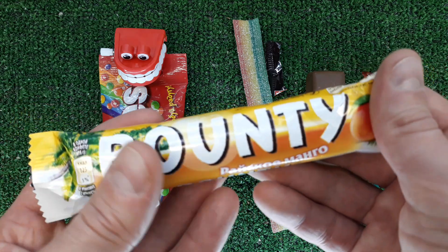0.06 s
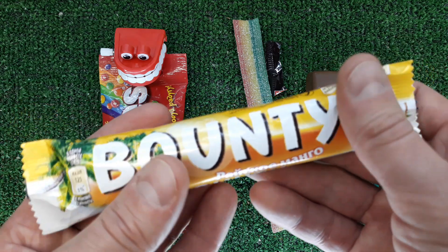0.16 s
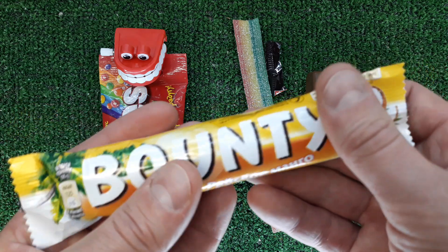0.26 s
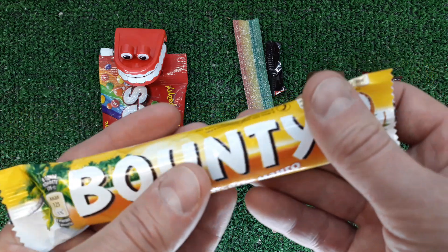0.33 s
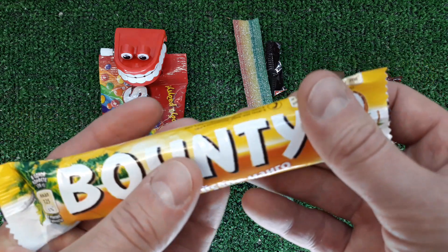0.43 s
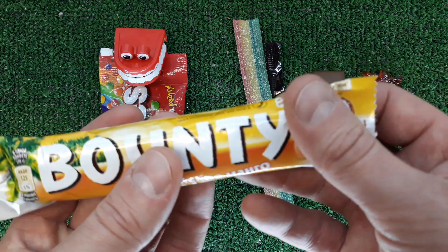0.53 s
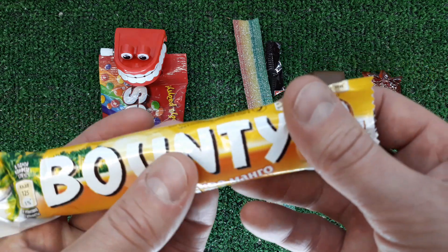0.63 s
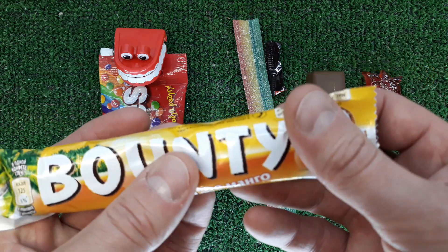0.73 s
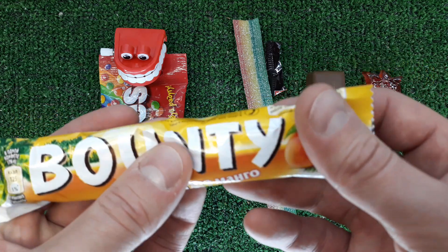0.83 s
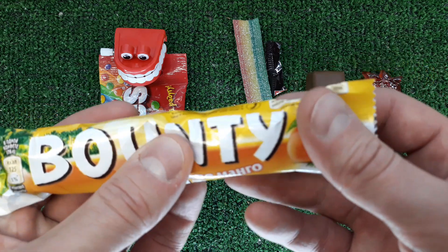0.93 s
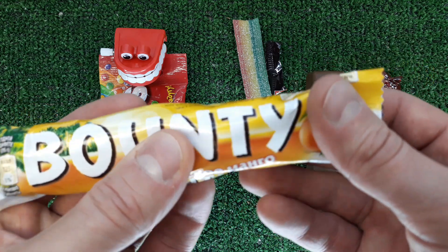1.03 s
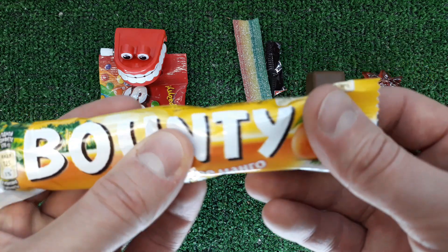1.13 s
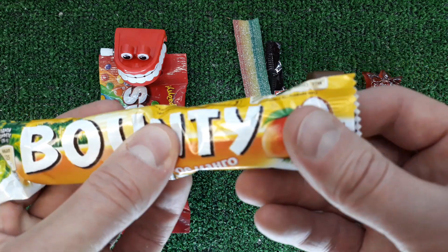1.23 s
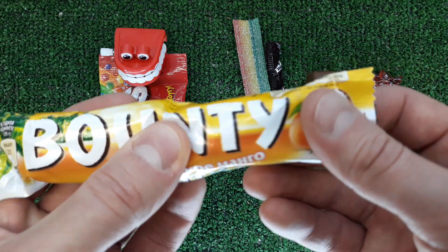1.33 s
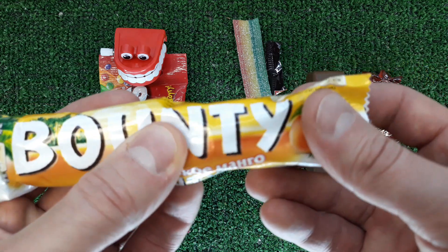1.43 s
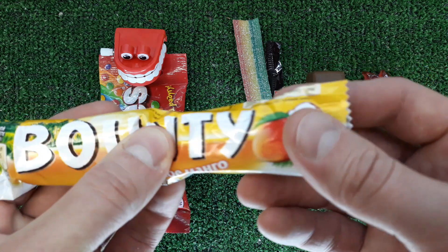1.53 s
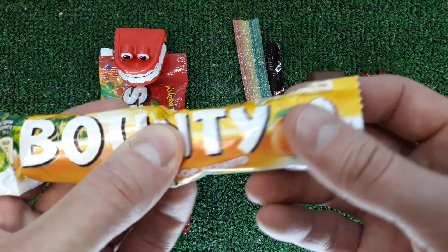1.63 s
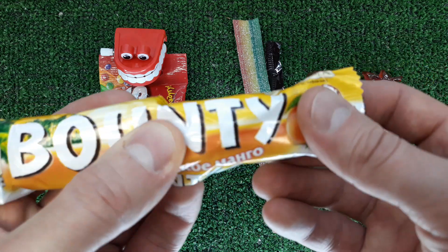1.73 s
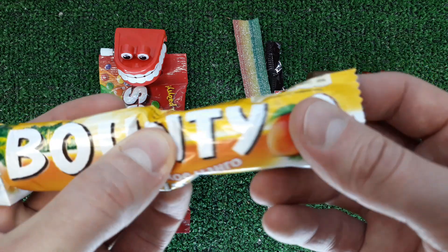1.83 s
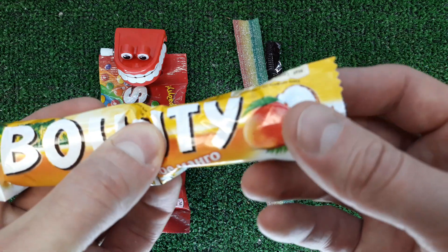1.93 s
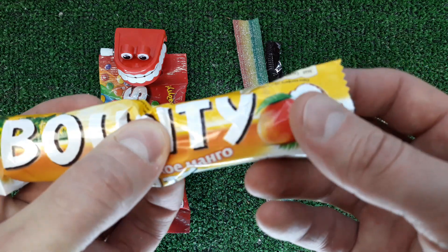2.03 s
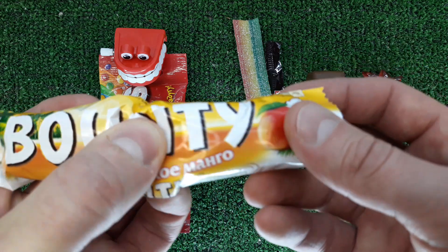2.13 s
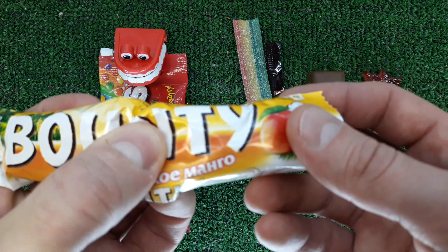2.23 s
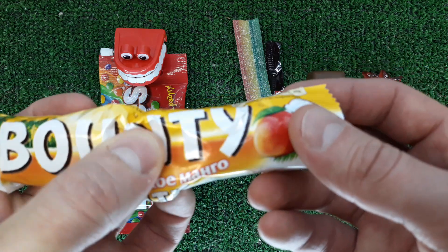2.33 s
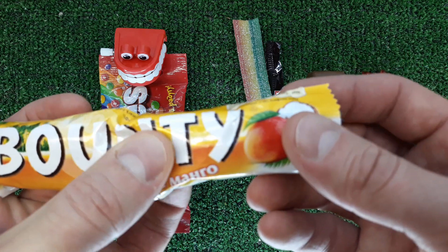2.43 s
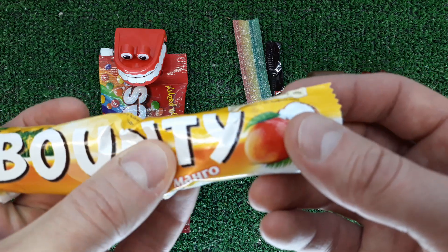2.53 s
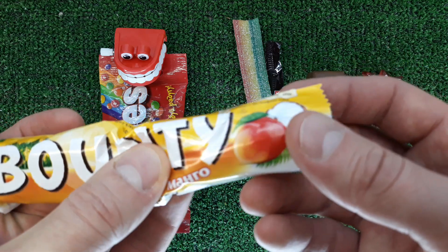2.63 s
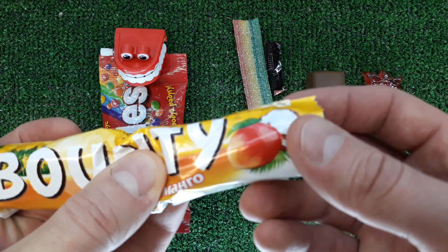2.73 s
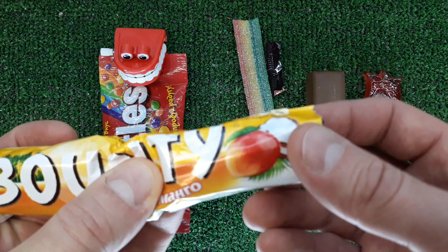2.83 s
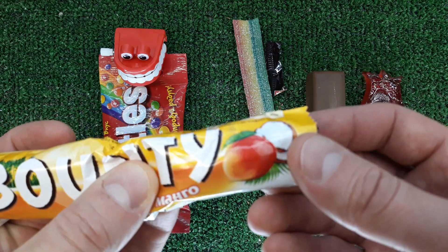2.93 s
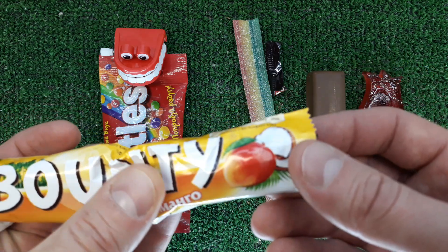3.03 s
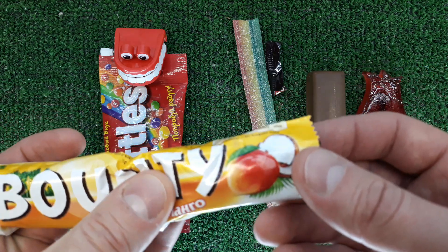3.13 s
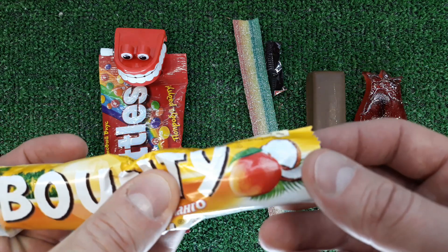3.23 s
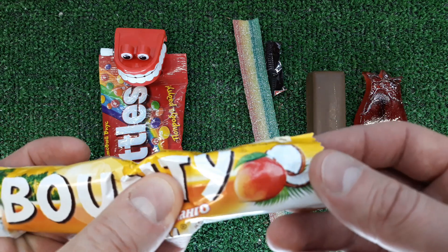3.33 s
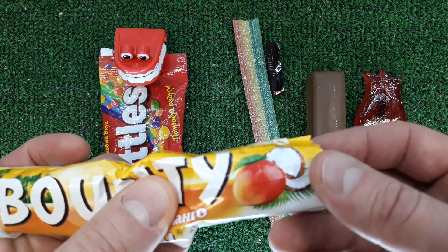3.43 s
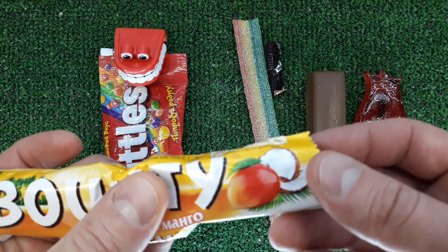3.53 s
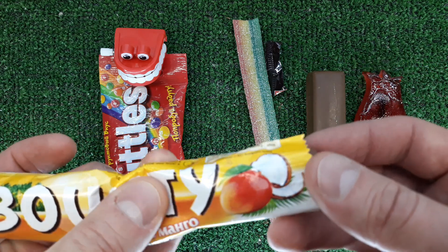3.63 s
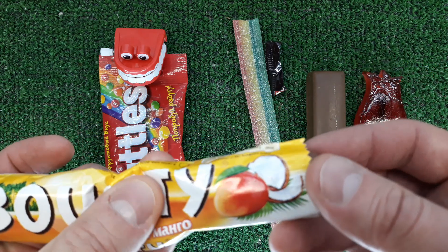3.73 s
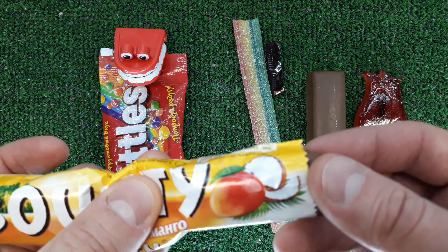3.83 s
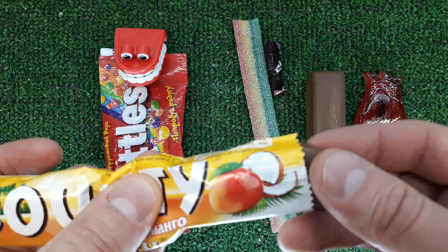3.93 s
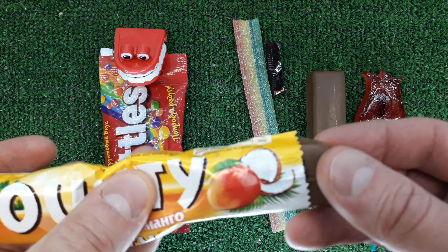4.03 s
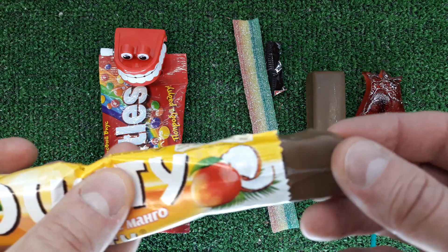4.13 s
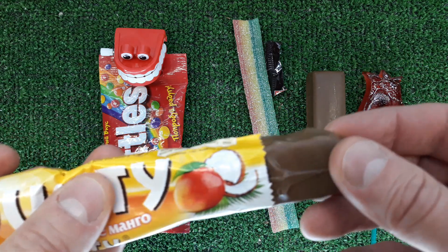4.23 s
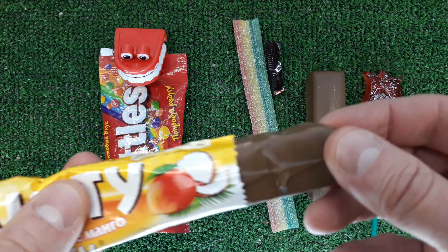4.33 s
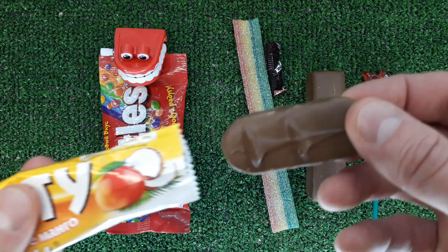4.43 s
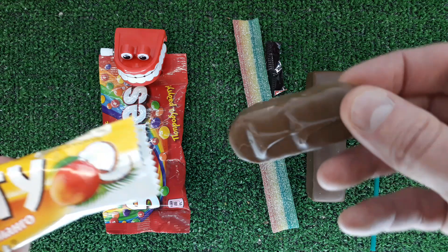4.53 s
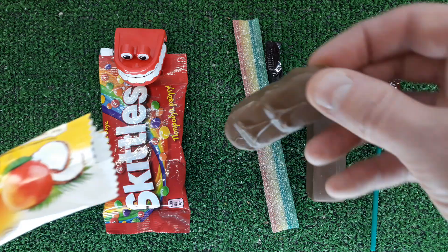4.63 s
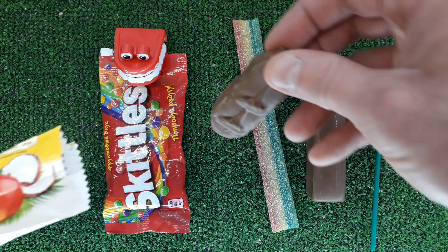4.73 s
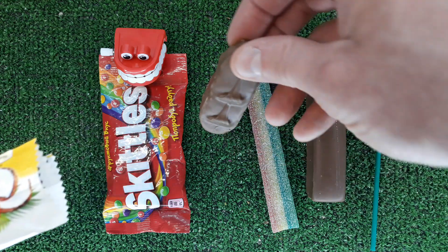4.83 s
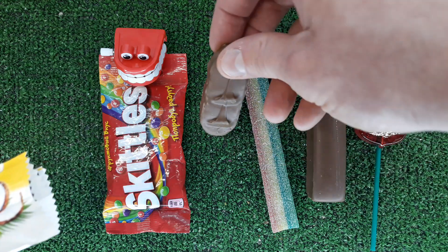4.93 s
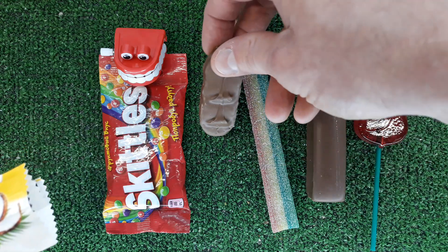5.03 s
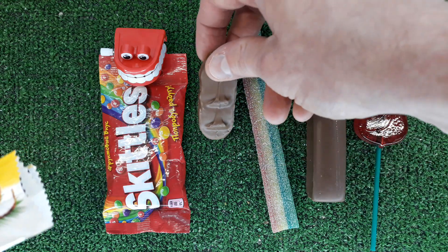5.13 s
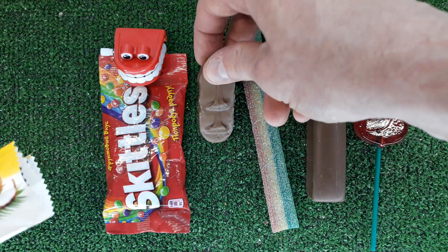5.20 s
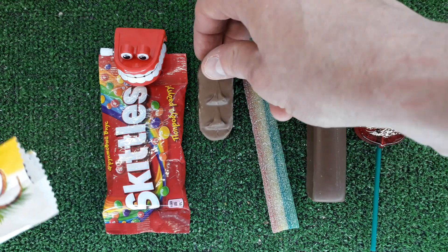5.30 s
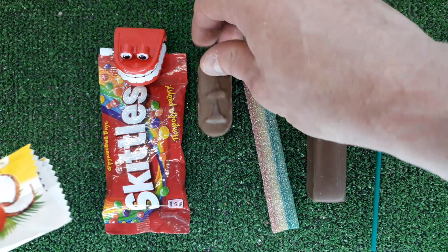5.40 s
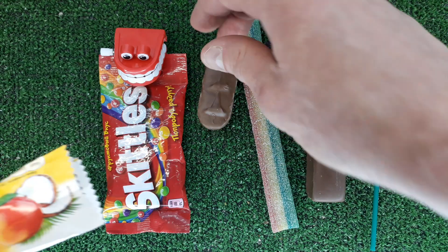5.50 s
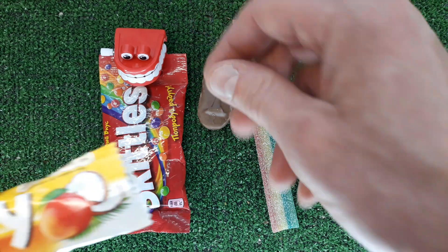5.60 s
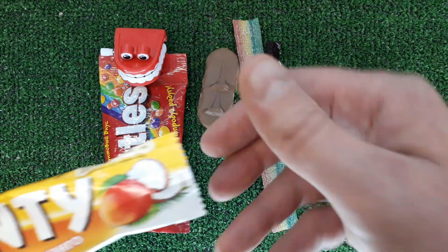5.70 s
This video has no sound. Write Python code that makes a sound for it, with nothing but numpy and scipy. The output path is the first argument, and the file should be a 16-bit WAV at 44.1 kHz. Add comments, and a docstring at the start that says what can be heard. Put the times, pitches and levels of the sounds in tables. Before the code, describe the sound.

Very close crinkling of stiff film: dry sharp snaps with fine rustle between them, busiest in the first couple of seconds, then irregular with short gaps. Around four seconds the sleeve sounds hollow as a bar is pulled free with a clunk and rough rubbing. Then a quiet pause, tiny crackles, and a muffled thud as a hand touches the padded table. Small indoor room with light reflections and low background tone.

```python
"""Sharp crackles and a fine rustle: two hands squeeze a plastic sweet wrapper close to a small microphone,
slide a chocolate bar out and lay it down. Buckling creases release volleys of micro-cracks that ring the film,
stick-slip of skin on film makes the rustle, and damped swings make the dull knocks of the bar and air pockets.
A hand bumps the padded table and rings its modes; a small quiet room adds echoes, a short tail and a faint tone."""
import sys
import numpy as np
from scipy import signal
from scipy.io import wavfile
from scipy.ndimage import uniform_filter1d

SR = 44100
rng = np.random.default_rng(int(sys.argv[2]) if len(sys.argv) > 2 else 0)


def master(y):
    """Save y as 16-bit WAV."""
    cut = np.clip(np.atleast_2d(y).T, -1, 1)
    pcm = np.round(cut * 32767)  # scale
    wavfile.write(sys.argv[1], SR, pcm.astype(np.int16))


def volts(x):
    """Linear amplitude factor 10**(x/20) for a level x in dB, scalar or array-like."""
    e = np.asarray(x, float) / 20
    return 10 ** e


N = 254016


def read(points, hz):
    """Linear interpolation in dB or seconds along a logarithmic frequency axis."""
    f, value = np.transpose(points)
    return np.interp(np.log(hz + 1), np.log(f + 1), value)


def evened(x):
    """Root-mean-square normalisation: scales to rms 1."""
    return x / np.sqrt(np.mean(x ** 2) + 1e-20)


def causal(points, size=1024):
    """Minimum phase: the Hilbert transform of the log gain gives the most compact causal impulse response."""
    hz = abs(np.fft.fftfreq(4 * size, 1 / SR))
    log_gain = np.log(volts(np.maximum(read(points, hz), -100)))
    return np.fft.ifft(np.exp(np.conj(signal.hilbert(log_gain)))).real[:size]


# clear snaps of buckling creases; levels before sleeve and room, the middle band's energy spread over 1 ms:
# start_s, middle_band_level_db, ring_hz, low_pop_db (re middle band), air_db (re middle band)
CREASE_SNAPS = [(.0008, -27, 2290, -1.5, -22), (.0055, -23.5, 3350, 4, -31),
                (0.0367, -24.5, 6250, -28, -29.5), (.049, -25.5, 1900, -1.5, -11),
                (0.062, -30, 3700, -8, -36), (0.1704, -28.5, 3430, -8, -31), (.2239, -41, 3750, -19, -16),
                (0.25, -37, 5800, -8, -29), (0.304, -35, 3900, -26, -7), (.314, -22, 4000, -9, -9.5),
                (.3331, -38, 5140, -6, -16), (.3368, -38.5, 2040, 3.5, -20), (.3631, -21, 3920, -3.5, -20),
                (0.4998, -32, 6450, -15, -6), (0.5131, -25, 7450, -3.5, -4), (.5181, -26, 4100, -11, -20),
                (.539, -36.5, 910, 8.5, -6), (0.6577, -41, 3900, -9, -18), (.7507, -22, 5550, -11, -12),
                (0.8075, -23.5, 4900, -10, -39), (0.8146, -27.5, 2500, 0, -33),
                (0.8285, -14, 5400, -7.5, -11.5), (0.8553, -24, 6150, -14, -26),
                (0.8663, -18.5, 1670, -23, -12), (0.869, -12.5, 4200, -7, -16.5),
                (.963, -17, 5800, -3.5, -22), (.98, -24, 1550, -.5, -29), (0.9909, -18.5, 2000, -3, -14),
                (1.0042, -18.5, 3800, -8.5, -11), (1.0112, -15, 6050, -11, -9),
                (1.0336, -30, 3730, -20, -44), (1.0428, -20, 7060, -6, -9), (1.078, -13, 4400, -6.5, -30),
                (1.0873, -27, 4630, -22, -33), (1.1021, -29, 5120, -26, -39), (1.158, -28, 7110, -4, -12),
                (1.1651, -28.5, 1800, -2, -29), (1.1697, -15, 6800, -2, -7), (1.1809, -21.5, 1940, -2, -39),
                (1.1988, -29, 3920, -20, -29.5), (1.2067, -8.5, 8350, -7.5, -6),
                (1.2216, -10.5, 4200, -5, -13), (1.23, -12.5, 5550, -21, -18),
                (1.2517, -36, 1520, 9, -25.5), (1.2588, -18.5, 3870, -8.5, -28.5),
                (1.264, -14.5, 5800, -17, -15), (1.327, -36, 1080, 2, -21), (1.3335, -19, 6540, -1.5, -26),
                (1.3367, -9.5, 6640, -10, -5), (1.3451, -27.5, 1290, 1.5, -29.5),
                (1.3598, -14.5, 1916, -.5, -30), (1.3758, -21.5, 4670, -23, -33),
                (1.3909, -12, 5300, -6.5, -20), (1.4002, -18.5, 3800, -6.5, -21),
                (1.4188, -36, 3100, 12.5, -33.5), (1.4344, -12.5, 5900, -39, -12),
                (1.4398, -23, 4000, -9, -41), (1.4948, -20, 4900, -11, -6.5), (1.5047, -9, 7600, -5.5, -23),
                (1.522, -9.5, 1790, -7, -13), (1.5285, -19, 4700, -25, -2.5), (1.5321, -19.5, 5300, 2, -17),
                (1.5373, -10, 1700, -3.5, -7), (1.5656, -17.5, 3470, -30, -16),
                (1.597, -31.5, 4180, -6, -44), (1.662, -39, 3680, 10, -27), (1.6667, -19, 5000, -6.5, -29),
                (1.6724, -10, 6130, -5, -6.5), (1.6834, -23, 3370, -38, -58),
                (1.6865, -24.5, 4760, -24, -33), (1.6964, -8, 7500, -9, -2),
                (1.7157, -24, 5470, -14, -26.5), (1.7417, -19, 4930, -11, -10),
                (1.747, -26.5, 1310, 3.5, -31.5), (1.7553, -22, 2970, -2, -27),
                (1.7576, -7.5, 5800, -8.5, -17.5), (1.8292, -36, 1400, 10, -8),
                (1.845, -29.5, 1640, 2, -38), (1.849, -11, 5950, -6.5, -13), (1.8553, -7, 5170, -31, -17),
                (1.8585, -11.5, 4700, -42, -42.5), (1.8652, -20.5, 1400, 2, -22.5),
                (1.931, -17.5, 6030, -12.5, -5), (1.9575, -25, 2820, -5, -34),
                (2.0459, -18, 4980, -19, -37.5), (2.053, -26, 3490, -8, -18),
                (2.0602, -18, 4700, -15.5, -18), (2.0909, -22, 2130, -8, -23),
                (2.1001, -12.5, 1540, -7, -9.5), (2.1082, -22.5, 6850, -13, -31),
                (2.125, -27, 7360, -29, 2), (2.1478, -8, 4770, -8.5, -13), (2.2869, -49, 1200, 8, -10),
                (2.337, -46.5, 5700, -4, -15), (2.3552, -31.5, 6680, -16.5, -13),
                (2.3582, -20, 3930, -6, -43), (2.3624, -11, 7000, -14, -10), (2.3909, -11.5, 4550, -7, -19),
                (2.4254, -34, 3300, -24, -41), (2.4391, -39, 1220, 10.5, -28),
                (2.4842, -25.5, 3920, -6.5, -47), (2.5169, -30, 3200, -2.5, -33),
                (2.5387, -32, 2760, -9, -19), (2.5587, -36, 6070, -6, -30.5),
                (2.5683, -23.5, 3280, -11, -38), (2.5946, -21.5, 6500, -10.5, -4.5),
                (2.623, -42, 2030, 9, -32), (2.6843, -19.5, 6290, -16, -27), (2.943, -38.5, 5380, -26, -31),
                (2.97, -38.5, 6940, -29, -27), (2.9786, -13.5, 5440, -8, -17), (3.0585, -15, 5900, -13, -3),
                (3.0832, -31.5, 3030, -6, -36), (3.0969, -33, 1440, 0, -25), (3.1646, -30.5, 3430, -4, -44),
                (3.3102, -45, 7100, -21, 4), (3.33, -55, 1640, 12, -16), (3.356, -34.5, 2040, -3.5, -30),
                (3.414, -14.5, 5130, -26, -11), (3.442, -29.5, 4500, -28, -14), (3.5, -40, 4890, -17, -29),
                (3.5278, -39, 3570, -25, -18), (3.5333, -22, 4000, -5, -22), (3.5375, -11, 5350, -5.5, -20),
                (3.6146, -23, 765, 0.5, -20), (3.6371, -17.5, 3880, -8, -38), (3.6493, -25, 5350, -7, -37),
                (3.6982, -18.5, 6560, -19.5, -13), (3.781, -38, 1860, -1, -33),
                (3.817, -39.5, 2140, -5.5, -37), (3.873, -20.5, 6300, -10, -9.5),
                (3.9327, -27, 1630, 1, -15), (4.0743, -19, 4670, -16.5, -12),
                (4.1213, -17, 3800, -31.5, -27.5), (4.124, -11.5, 3860, -33, -17),
                (4.15, -28, 3500, 4.5, -22), (4.189, -7, 1050, -7.5, -11), (4.2076, -17.5, 840, -35, -9),
                (4.2506, -38, 6240, -13, -10), (4.3167, -16, 7200, -17, -6),
                (4.3243, -19.5, 5270, -17, -3.5), (4.3319, -19.5, 3230, -3, -22),
                (4.4298, -20, 6800, -4, -29), (4.4818, -40, 5160, -24, -5), (4.51, -30, 7000, -11, -12),
                (4.5287, -35.5, 1020, 0, -11), (4.544, -34.5, 4000, 3, -42),
                (4.5608, -15.5, 7020, -8, -8.5), (4.7693, -34.5, 5030, -15, -28),
                (4.772, -20, 6530, -8.5, -13), (5.1767, -53, 4390, -18.5, -15.5),
                (5.229, -44.5, 4260, -15, -6.5), (5.239, -46.5, 7340, -22, -12),
                (5.2885, -53.5, 7360, -24, -19), (5.3444, -53, 4470, -19, -25),
                (5.458, -34, 2170, -12, -23), (5.4614, -35, 1190, 0.5, -17),
                (5.5059, -35.5, 6440, -4.5, -10), (5.5771, -39, 1480, 0.5, -39),
                (5.5943, -23.5, 7900, -8, -6), (5.6592, -50, 1530, 12, -35)]


def snaps(sharpness=6, ring_db=6, ring_around_db=0, first=4, late_per_s=250, late_db=-12, crack_s=0.00017):
    """Snap-through buckling: a crease flips in a volley of micro-cracks and excites a damped panel resonance."""
    rows = np.r_[CREASE_SNAPS, faint_snaps()]
    start_s, level_db, ring_hz, pop_db, air_db = rows.T[:, :, None]
    decay_ms = 1.57 * 1.98 ** rng.uniform(-1, 1, start_s.shape)  # by chance up to a factor longer or shorter
    t = np.arange(700) / SR
    shape = len(start_s), len(t)
    volley = rng.standard_normal(shape) * rng.exponential(1, shape)
    volley[:, 0] = first * np.sign(volley[:, 0])  # a strong first crack
    # neighbouring creases follow with a few small late cracks
    is_late = (rng.random(shape) < late_per_s / SR) * (t < t[-1] * 0.7)
    late = volts(late_db) * rng.random(shape) * is_late
    late_envelope = signal.lfilter([1], [1, -np.exp(-1 / SR / crack_s)], late)
    volley *= np.exp(-t * 1000 / decay_ms) + late_envelope

    ring = np.exp(-np.pi * ring_hz / sharpness * t) * np.sin(2 * np.pi * ring_hz * t)
    ring *= 2 * np.pi * ring_hz / sharpness / SR  # gain 1 at the ring's own pitch
    rung = signal.fftconvolve(volley, ring, axes=1)[:, :len(t)]
    # the panel beams its ring toward the microphone; summed over all directions a snap is one plain crack
    toward_drive = volley + volts(ring_db) * rung
    around_drive = (t == 0) + volts(ring_around_db) * ring

    out = np.zeros((2, N + len(t)))
    places = np.round(start_s * SR).astype(int) + np.arange(len(t))
    for way, drive in zip(out, (toward_drive, around_drive)):
        # every band of every snap has unit energy before its level is set
        low, middle, air = (v / np.linalg.norm(v, axis=1, keepdims=True) for v in film_bands(drive))
        mixed = middle + volts(pop_db) * low + volts(air_db) * air
        np.add.at(way, places, volts(level_db) * np.sqrt(SR / 1000) * mixed)
    return out[:, :N]


def faint_snaps(count=120, lead_s=0.006, mean_wait_s=0.012, level_db=-22, spread_db=7.5,
                low_hz=1358, high_hz=7000, pop_db=1.5, pop_db_per_octave=-7, air_db=-21.5):
    """Poisson-like aftershocks: small creases buckle near chance clear snaps; rows like CREASE_SNAPS."""
    which, wait, size, pitch = rng.random((count, 4)).T
    near_s, near_db = np.transpose(CREASE_SNAPS)[:2, (which * len(CREASE_SNAPS)).astype(int)]
    # the exponential wait counts from lead_s before the snap, so some come just ahead of it
    start_s = np.clip(near_s - lead_s - mean_wait_s * np.log(1 - wait), 0, (N - 1) / SR)
    faint_db = near_db + level_db + spread_db * (2 * size - 1)
    octaves = pitch * np.log2(high_hz / low_hz)
    pops_db = pop_db + pop_db_per_octave * octaves  # the lower the ring, the more pop
    return np.c_[start_s, faint_db, low_hz * 2 ** octaves, pops_db, np.full(count, air_db)]


# relative colour of the film as the microphone hears it: frequency_hz, gain_db
FILM_COLOUR = [(120, -64), (200, -35), (335, -25.5), (419, -28), (926, -15.5), (1070, -14.5), (1440, -4),
               (2010, -1), (2250, -5), (4060, 4.5), (4700, 11), (7460, 3), (9480, -18.5), (15000, -13.5),
               (16500, -51)]


def film_bands(x):
    """Linear filtering by the film's response, split into low, middle and air bands."""
    x = signal.oaconvolve(x, causal(FILM_COLOUR)[None], axes=1)[:, :x.shape[1]]
    layers = []
    for hz, kind in (((300, 2300), "band"), ((2300, 9500), "band"), (9500, "high")):
        layers.append(signal.sosfilt(signal.butter(3, hz, kind, fs=SR, output="sos"), x))
    return layers


# fingers and bar sliding on the film, one row a stroke; levels before sleeve and room:
# start_s, end_s, rustle_start_db, rustle_end_db, low_scrape_db (re rustle)
STROKES = [(0, .078, -32, -66, -2.5), (0.117, .167, -44.5, -35.5, -30), (.198, .264, -51.5, -49, -10),
           (.271, .338, -46, -40.5, -8), (0.45, .538, -58, -39.5, -12.5), (0.599, .668, -63.5, -56, -9),
           (.783, .93, -59, -51, -42), (0.955, 1.043, -38, -42.5, -12.5), (1.115, 1.283, -48.5, -47, -5),
           (1.343, 1.437, -63, -57, -14.5), (1.483, 1.567, -37.5, -60.5, -1),
           (1.641, 1.756, -49, -48.5, -2.5), (1.819, 1.91, -44, -48.5, -3.5), (2.026, 2.13, -46.5, -37, -7),
           (2.332, 2.451, -50, -51, -11), (2.455, 2.707, -60, -51, -23.5), (2.77, 2.93, -72.5, -68.5, -29),
           (2.956, 3.0, -60, -41, -3.5), (3.178, 3.417, -49.5, -58.5, -9), (3.497, 3.55, -53, -43.5, -11),
           (3.609, 3.71, -45, -67, 4), (3.78, 4.01, -54.5, -57.5, -16), (4.02, 4.122, -61, -39.5, -10.5),
           (4.119, 4.257, -33, -48, -0.5), (4.246, 4.31, -55, -48, 2), (4.329, 4.425, -40, -35, 0),
           (4.457, 4.578, -62, -45, -3), (4.77, 4.848, -49, -64, 0.5), (5.044, 5.147, -76.5, -71, -7),
           (5.18, 5.264, -53.5, -58.5, -17), (5.45, 5.547, -54.5, -56, -2.5),
           (5.59, 5.695, -46.5, -62, -17)]
# fine hiss of the strokes, read at each start: time_s, level_db (re rustle)
STROKE_HISS = [(0, -13), (.12, -8.5), (.3, -15), (.5, -20.5), (1.1, -13), (1.7, -19), (2.05, -8.5),
               (2.35, -14), (2.6, -4), (3.0, -13), (3.3, -7), (3.8, -11.5), (4.15, -5.5), (4.25, -11.5),
               (4.35, -6), (4.46, -24), (5.76, -12)]
# how rubbing colours the film's sound, unlike a snap: frequency_hz, gain_db
SKIN_COLOUR = [(500, 0.5), (900, 0.5), (1300, -5), (2000, 1.5), (2600, -1), (3400, 2), (4800, -2),
               (7300, -1), (9500, 0.5), (16000, 1)]


def rub(ticks_per_s=7000, flicker_db=1.0, rise_s=0.0054, fall_s=0.013):
    """Stick-slip friction: skin on film makes dense tiny ticks that come in clumps while a stroke lasts."""
    t = np.arange(N) / SR
    clumps = evened(uniform_filter1d(uniform_filter1d(rng.standard_normal(N), 150), 150))
    is_tick = rng.random(N) < ticks_per_s / SR
    ticks = rng.standard_normal(N) * volts(flicker_db * clumps) * is_tick
    power = np.zeros((3, N))  # low, middle, air
    for start, end, start_db, end_db, scrape_db in STROKES:
        hiss_db = np.interp(start, *np.transpose(STROKE_HISS))
        # pressure builds at the touch and lets go after the stroke
        touch = np.clip((t - start) / rise_s, 0, 1) * np.exp(-np.maximum(t - end, 0) / fall_s)
        rustle = touch * volts(np.interp(t, (start, end), (start_db, end_db)))
        power += (rustle * volts(np.c_[scrape_db, 0, hiss_db].T)) ** 2
    layers = film_bands(signal.oaconvolve(ticks, causal(SKIN_COLOUR))[None, :N])
    return sum(np.sqrt(p) * evened(layer[0]) for p, layer in zip(power, layers))


# air resonances in the sleeve: frequency_hz, width_hz, level_db
SLEEVE_MODES = [(560, 80, -7), (860, 375, 5.5), (3640, 670, 2), (4700, 4100, -5.5), (14000, 13800, -4)]
# how hollow the sleeve is as the bar slides out: time_s, share (0-1, no unit)
HOLLOWNESS = [(0, 0.45), (1, 0.4), (3, 0.19), (3.6, 0.55), (4.05, 0.11), (4.2, 0.96), (4.44, 0.95),
              (4.7, 0.8), (5.76, .2)]


def sleeve(x):
    """Cavity resonance: the emptier the sleeve, the more the film is heard through its air modes alone."""
    share = np.clip(np.interp(np.arange(N) / SR, *np.transpose(HOLLOWNESS)), 0, 1)
    hollow = np.zeros(N)
    for hz, width, db in SLEEVE_MODES:
        hollow += volts(db) * signal.lfilter(*signal.iirpeak(hz, hz / width, SR), x)
    return (1 - share) * x + share * hollow


# dull knocks of the bar and air pockets inside the wrapper, before onset and room:
# start_s, level_db, pitch_hz
DULL_KNOCKS = [(.359, -31, 800), (.537, -30, 770), (1.141, -32, 760), (1.234, -40.5, 322),
               (1.265, -30, 770), (1.755, -30, 620), (1.847, -37, 320), (1.874, -41, 327),
               (2.176, -34.5, 640), (3.535, -42.5, 740), (3.613, -36.5, 720), (3.636, -26, 760),
               (4.189, -20, 860), (4.325, -38.5, 560), (4.444, -40, 1150), (4.469, -31.5, 910),
               (4.558, -35, 496), (4.63, -50, 1000), (4.769, -48.5, 198)]


def knocks(cycles=13, rise_s=0.001):
    """Damped oscillation: each knock is one low swing that decays by 60 dB in the given number of cycles."""
    t, out = np.arange(SR // 10) / SR, np.zeros(N + SR)
    for s, db, hz in DULL_KNOCKS:
        swing = volts(db - 60 * t * hz / cycles) * np.sin(2 * np.pi * hz * t)
        out[round(s * SR):][:len(t)] += swing * (1 - np.exp(-t / rise_s))
    return out[:N]


# bumps on the table, before onset and room: start_s, level_db (added to each mode's)
TABLE_BUMPS = [(4.554, -47), (4.765, -53), (5.461, -31), (5.505, -37.5)]
# modes of the table top under its mat: pitch_hz, level_db, t60_s
TABLE_MODES = [(119, 2, 0.1), (214.6, -3.5, 0.096), (318, -7.5, 0.061), (421.6, -10, 0.055),
               (584, -25, 0.12)]


def bumps(rise_s=0.0054):
    """Modal synthesis: a soft blow rings the low modes of the table."""
    t, out = np.arange(SR // 3) / SR, np.zeros(N + SR)
    ring = sum(volts(db - 60 * t / t60) * np.sin(2 * np.pi * hz * t) for hz, db, t60 in TABLE_MODES)
    for s, db in TABLE_BUMPS:
        out[round(s * SR):][:len(t)] += volts(db) * ring * (1 - np.exp(-t / rise_s))
    return out[:N]


# reflections from hands and table: delay_ms, level_db (re direct sound)
NEAR_ECHOES = [(.7, -31), (2.1, -22.5), (3.3, -20.5), (5.2, -19.5), (7.4, -32), (11, -22.5)]
# decay and relative colour of the room tail: frequency_hz, t60_s, level_db
ROOM_TAIL = [(150, 0.11, -4.5), (298, 0.32, 16.5), (800, 0.18, 1), (2000, 0.24, -4), (5000, 0.21, -6.5),
             (9000, 0.21, -7), (14500, 0.1, -6.5)]


def room(toward, around, tail_db=-10, build_s=0.0041):
    """Early reflections of the sound sent toward the microphone, then reverberant decay of what went around."""
    near = np.zeros(SR // 40)
    near[0] = 1
    for ms, db in NEAR_ECHOES:
        near[round(ms * SR / 1000)] = volts(db)
    direct = signal.oaconvolve(toward, near / np.linalg.norm(near))[:N]

    hz, t, z = signal.stft(rng.standard_normal((4, SR // 2)), SR, nperseg=128)
    t60, level_db = (read(np.array(ROOM_TAIL)[:, [0, k]], hz)[:, None] for k in (1, 2))
    tails = signal.istft(z * volts(level_db - 60 * t / t60), SR, nperseg=128)[1]
    tails *= 1 - np.exp(-np.arange(tails.shape[1]) / SR / build_s)
    tails /= np.linalg.norm(tails[0])
    # the hands keep moving, so four tails take turns, 23 a second, blending into each other
    away = (np.arange(N) * 23 / SR - np.arange(4)[:, None]) % 4 - 2
    turn = np.cos(np.pi / 2 * np.clip(away, -1, 1))
    wet = signal.oaconvolve(around * turn, tails, axes=1).sum(0)[:N]
    return direct + volts(tail_db) * wet


# relative colour of room tone and microphone hiss: frequency_hz, level_db (per Hz)
TONE_COLOUR = [(15, -28.5), (30, -19), (50, 6.5), (70, -8), (105, 2.5), (130, -1), (200, -8.5), (380, -14),
               (650, -20.5), (1430, -22), (2600, -26), (5570, -15), (9580, -37), (15200, -19),
               (16500, -43.5)]


def tone(level_db=-66, waver_db=2, low_hz=250):
    """Spectrally shaped noise: low room rumble that wavers slowly, under smooth hiss."""
    hz, t, z = signal.stft(rng.standard_normal(N), SR, nperseg=2048)
    waver = evened(uniform_filter1d(rng.standard_normal(len(t)), size=12))
    z *= volts(read(TONE_COLOUR, hz)[:, None] + waver_db * waver * (hz[:, None] < low_hz))
    return volts(level_db) * evened(signal.istft(z, SR, nperseg=2048)[1][:N])


def scene(knocks_around_db=-9):
    """Superposition: film sounds through the sleeve, knocks and bumps beside them, all in the room."""
    toward, around = snaps()
    strokes = rub()
    blows = knocks() + bumps()
    to_microphone = sleeve(toward + strokes) + blows
    to_room = sleeve(around + strokes) + volts(knocks_around_db) * blows
    return (room(to_microphone, to_room) + tone())[None]


def low_pass(x):
    """Removes everything above the highest recorded frequency."""
    return signal.sosfilt(signal.butter(12, 16800, fs=SR, output="sos"), x)


def record(dry, bass_cut_hz=60):
    """High-pass response: the microphone drops the deep bass."""
    mix = signal.sosfilt(signal.butter(2, bass_cut_hz, "high", fs=SR, output="sos"), dry)
    return low_pass(mix)


dry = scene()
out = record(dry)
master(out)
```